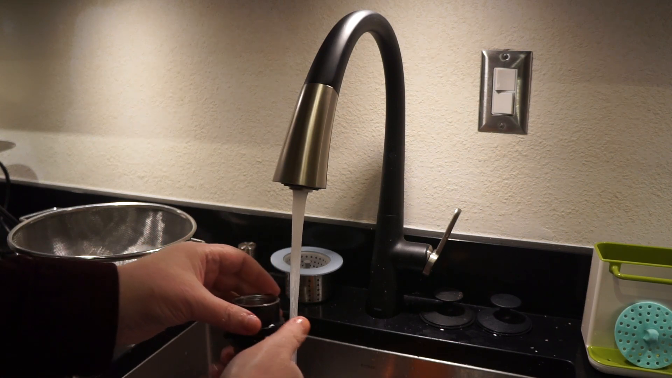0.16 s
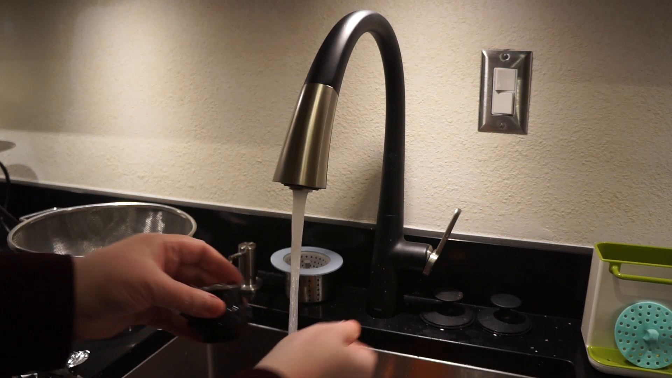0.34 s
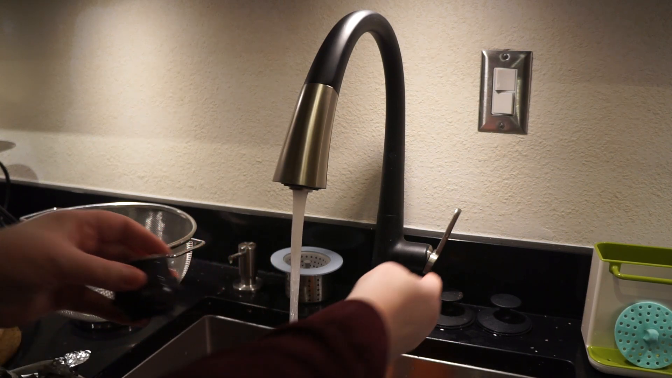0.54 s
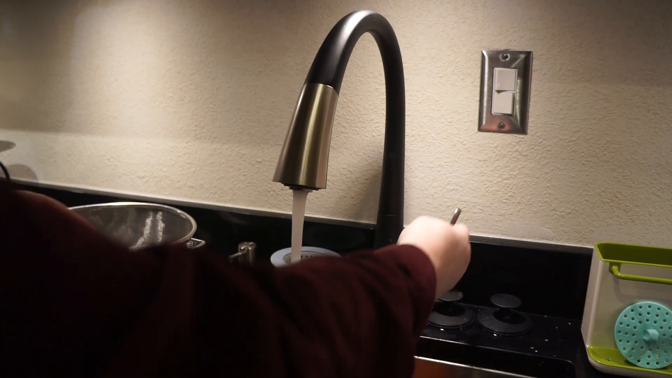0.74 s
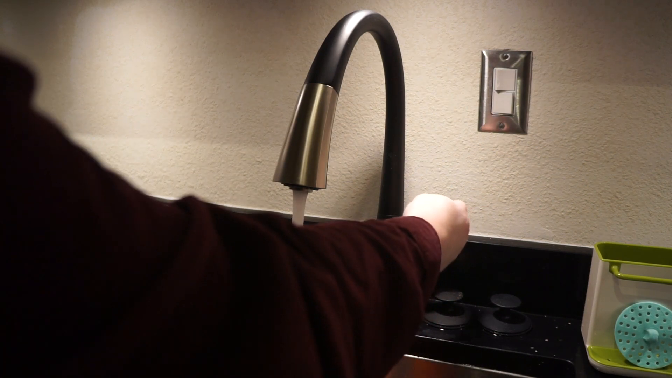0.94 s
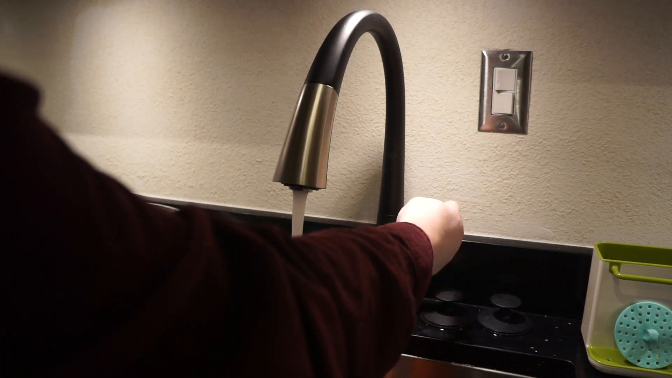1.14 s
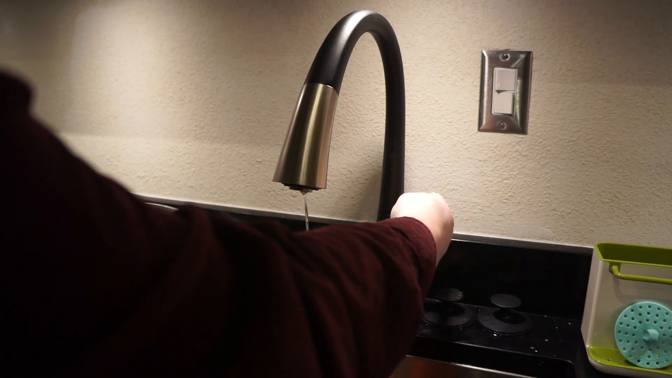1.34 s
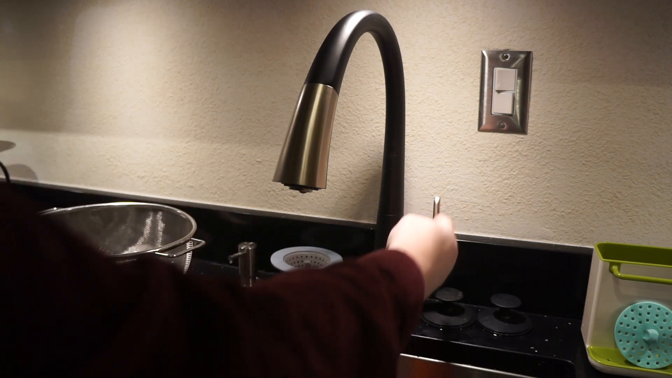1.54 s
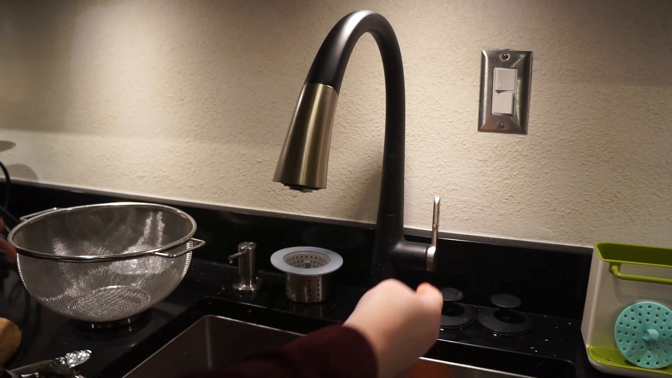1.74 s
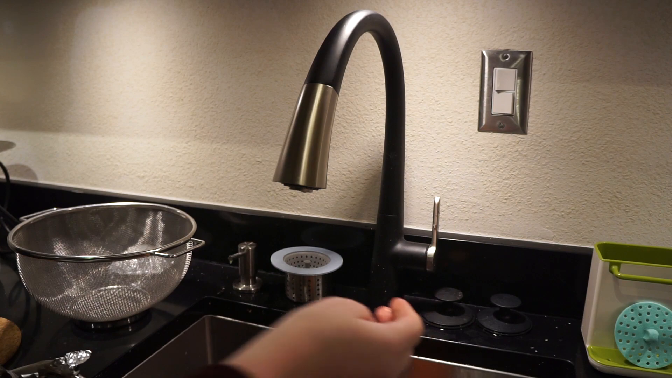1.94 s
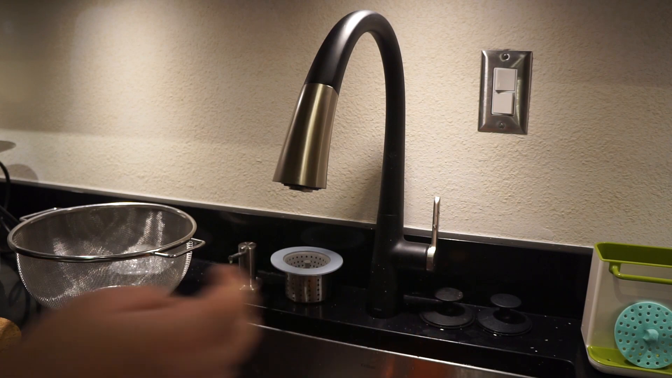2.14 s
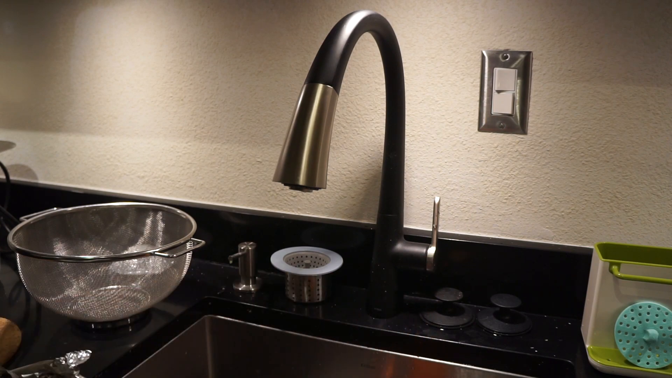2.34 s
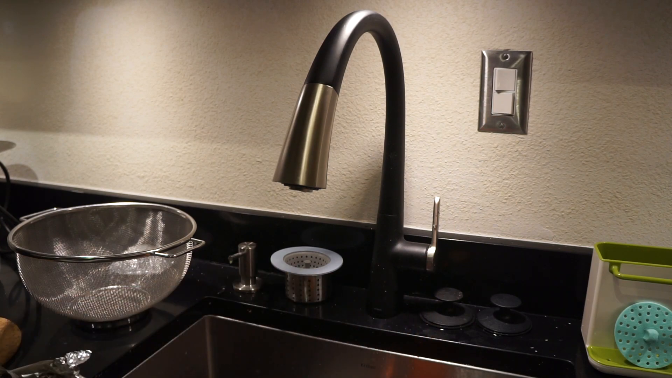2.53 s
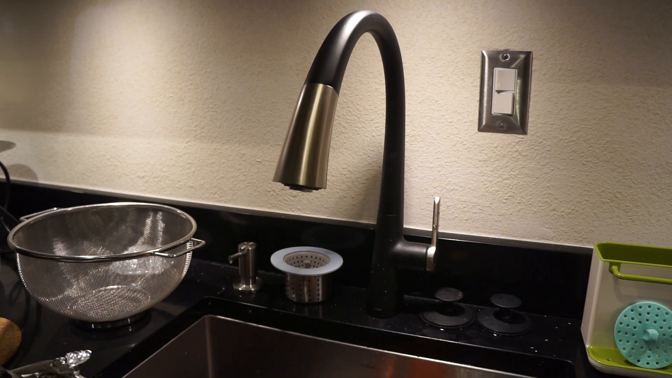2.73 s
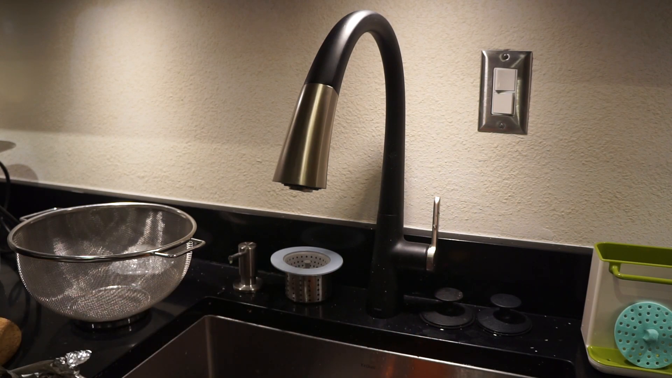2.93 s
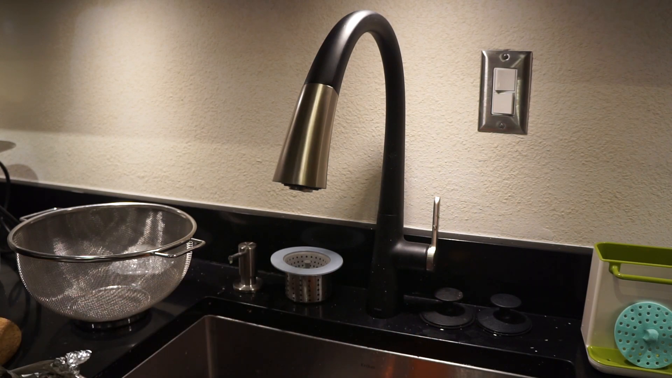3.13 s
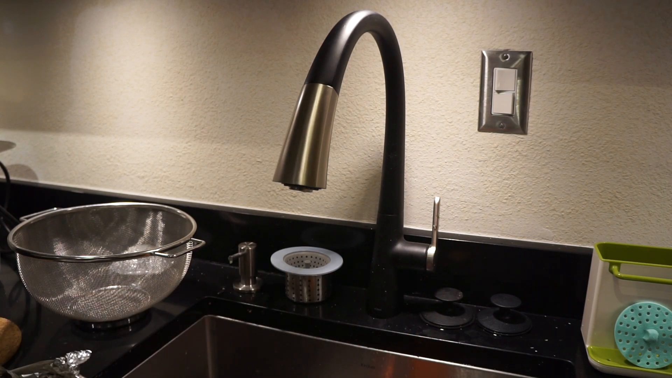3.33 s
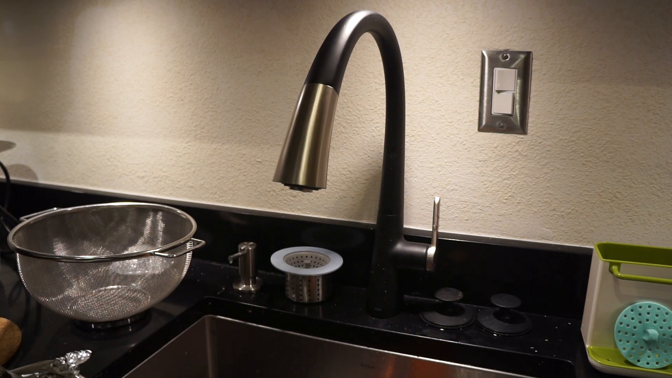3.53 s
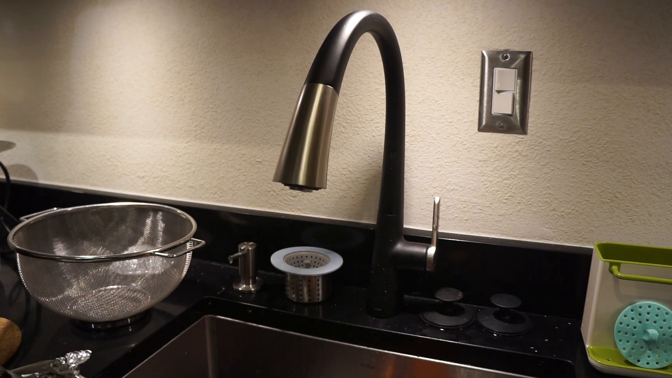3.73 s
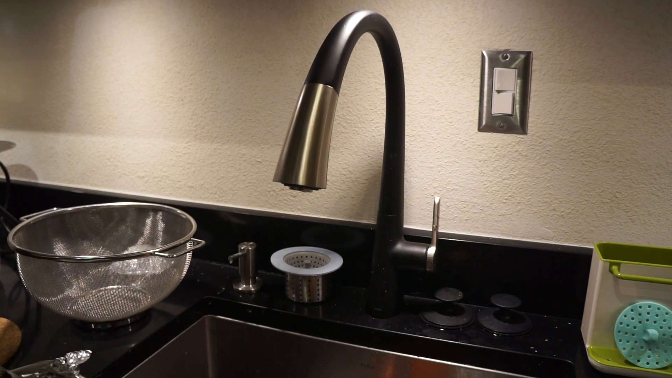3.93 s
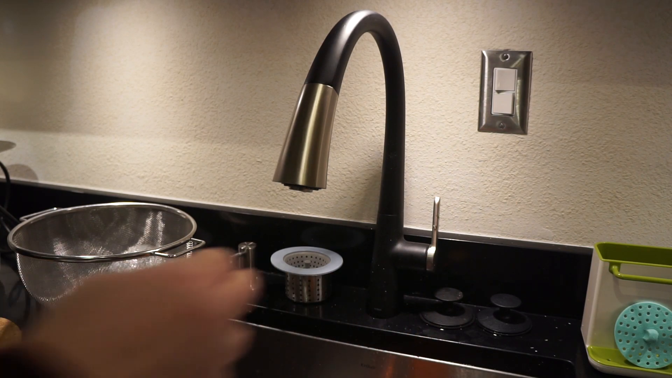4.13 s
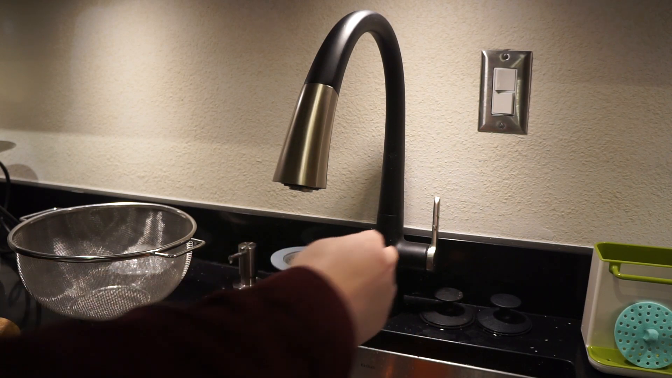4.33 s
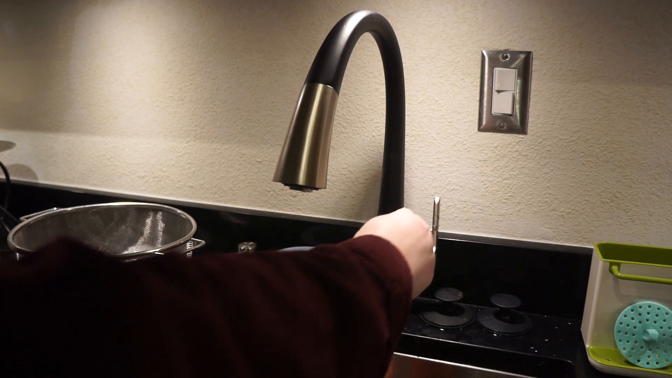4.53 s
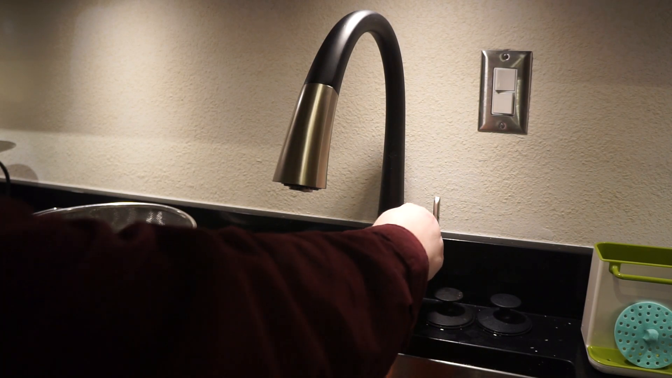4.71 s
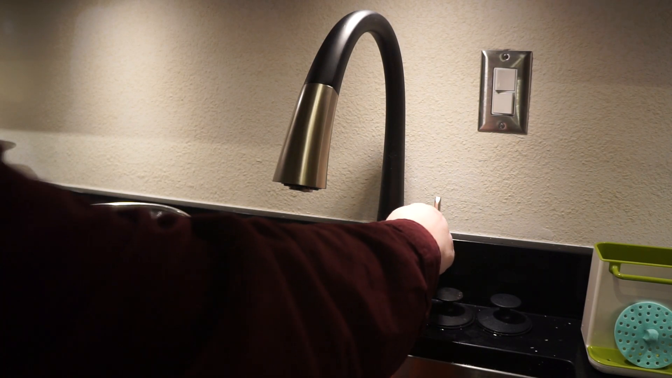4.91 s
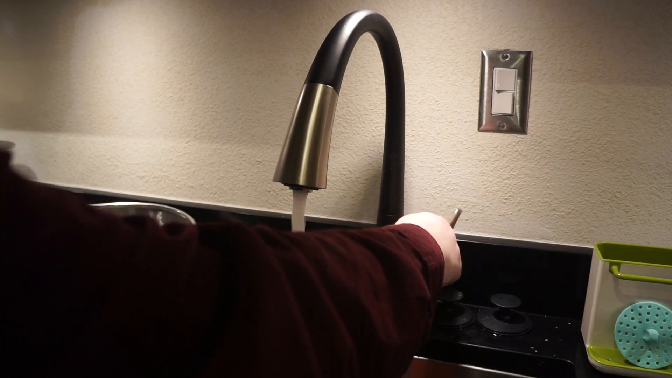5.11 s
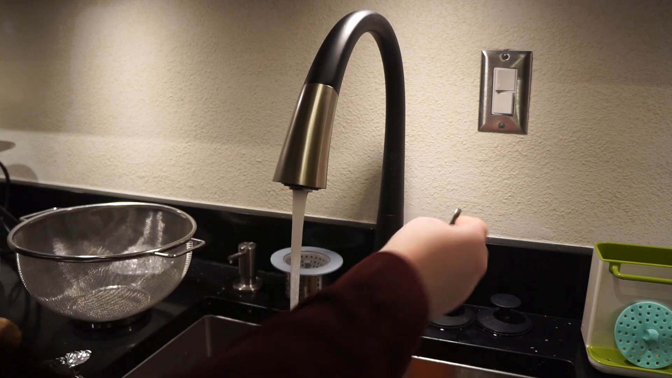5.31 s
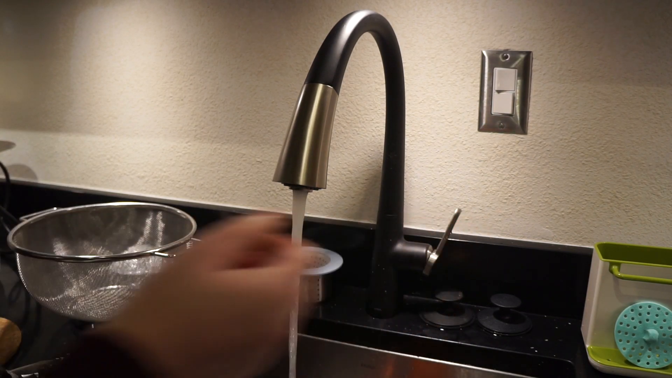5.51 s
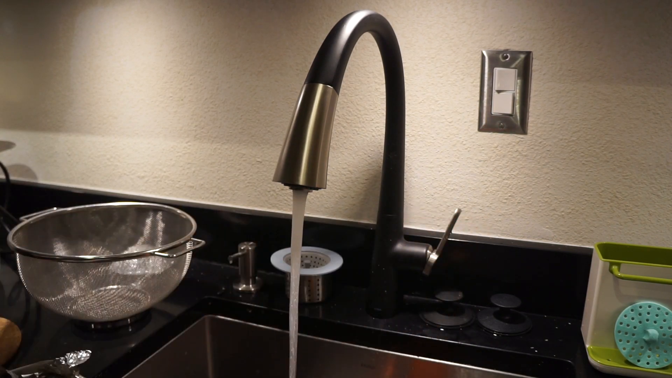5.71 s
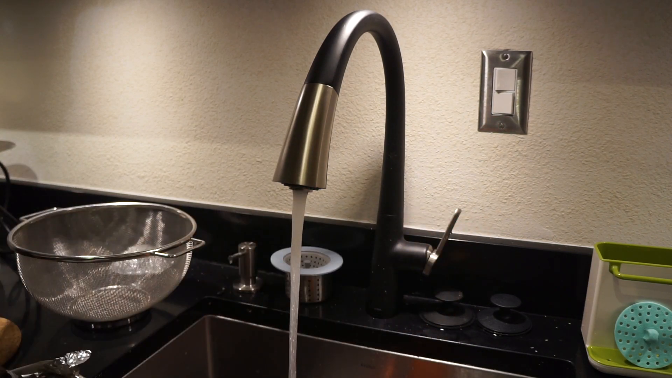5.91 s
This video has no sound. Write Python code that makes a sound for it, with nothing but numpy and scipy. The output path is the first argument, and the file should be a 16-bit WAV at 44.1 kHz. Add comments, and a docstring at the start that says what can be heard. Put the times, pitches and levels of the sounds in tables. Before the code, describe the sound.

A kitchen tap splashes brightly into a steel sink, shuts off, leaves a quiet pause with rustles and a dull clatter, then runs again.

```python
"""Kitchen tap and steel sink.

An aerated tap pours into a steel sink, is shut off, and is opened again; its jet, filtered noise, hisses before
the water, a mass of damped droplet tones echoed by the ringing steel, lands. In the pause the last water drips away,
something rustles and ticks beside the sink, and something clatters dully on the counter: noise bursts through modes.
An appliance hums as a sum of sines in a small, hard room, whose echo is decaying noise convolved with the sources."""
import sys
import numpy as np
from scipy import signal
from scipy.fft import rfft, irfft, next_fast_len
from scipy.io import wavfile
from scipy.ndimage import uniform_filter1d, map_coordinates

SR = 44100
rng = np.random.default_rng(int(sys.argv[2]) if len(sys.argv) > 2 else 0)


def put_to_file(sound):
    """Save the sound as 16-bit audio at rate SR, in the file named by the first command-line argument."""
    columns = np.atleast_2d(sound).T  # one column per channel
    safe = np.clip(columns, -1, 1)
    whole_steps = np.round(safe * 32767)
    wavfile.write(sys.argv[1], SR, whole_steps.astype(np.int16))


N = 262836

# appliance hum lines: (frequency [Hz], relative level [dB], phase wander [rad])
HUM_LINES = [(119.8, -56, .2), (178, -60, .7), (205.5, -52.5, .35), (237, -51.8, .12), (318, -61, .25),
             (480, -69, .3), (902, -72, .3)]
# spectra of room air, room rumble and counter boom: (frequency [Hz], relative level [dB])
AIR_SPECTRUM = [(53, -50), (90, -26), (107, -3), (148, -5), (162, -7), (239, -3.5), (266, -6), (316, -9.5),
                (478, -15), (1570, -22), (2830, -27.5), (4550, -27), (6030, -31), (11100, -32),
                (16000, -31.5)]
RUMBLE_SPECTRUM = [(15, -5), (30, -3), (50, 0.5), (85, -2), (130, 1.5), (300, -58)]
BOOM_SPECTRUM = [(20, 1.5), (50, 1), (90, 0), (140, -3.5), (300, -40)]
# spectra of rubbing, clattering parts and counter thud: (frequency [Hz], relative level [dB])
RUBBING_SPECTRUM = [(240, -36.5), (400, -2), (765, -9), (921, -4), (1440, -11.5), (1680, -4.5), (2020, -9),
                    (3160, -11), (6050, -14), (14400, -11.5), (16000, -28.5)]
KNOCK_SPECTRUM = [(150, -27), (400, -5.5), (1100, 4.5), (1800, 0), (2250, -5), (2800, -19), (5000, -18),
                  (8000, -47), (15000, -44)]
THUD_SPECTRUM = [(20, -9), (48, -7), (85, -8), (150, 2), (220, 8), (320, -3.5), (700, -41)]
# spectra of the aerated jet and of the water on steel: (frequency [Hz], relative level [dB])
AERATOR_SPECTRUM = [(180, -11), (300, -3), (343, -11), (462, -3.5), (842, -21.5), (915, -15.5), (1640, -2),
                    (1810, -6), (2480, 2.5), (3130, -3.5), (4990, 0.5), (6520, -1.5), (14500, 3),
                    (16000, -4.5)]
SPLATTER_SPECTRUM = [(500, -47.5), (1200, -35), (2100, -15), (2550, -7.5), (2960, -8.5), (3300, -2.5),
                     (4700, -0.5), (5500, 1.5), (6300, 5.5), (8000, -10), (16000, -40)]
SPRAY_SPECTRUM = [(2000, -32.5), (4500, -4.5), (6200, -3.5), (7500, 0), (10000, 0), (13500, 1.5),
                  (15500, 3.5), (16100, -41.5)]
DRUM_SPECTRUM = [(80, -21), (170, 4.5), (250, -10), (340, -9.5), (450, -3.5), (600, -8.5), (1000, -7),
                 (1400, -11.5), (2000, -5.5), (4000, -49)]
# left-right likeness of room sounds and water: (frequency [Hz], likeness [0-1])
ROOM_LIKENESS = [(100, 0.99), (250, 0.9), (600, 0.58), (1300, 0.25), (2500, 0.2), (6000, 0.045)]
WATER_LIKENESS = [(200, 1), (1000, 0.76), (2500, 0.84), (5000, 0), (16000, 0)]
# reverberation of the kitchen: (frequency [Hz], T60 [s])
KITCHEN_T60 = [(100, 0.25), (1000, 0.45), (5000, 0.29), (15000, 0.11)]
# modes of brushed things, knocked parts, and pipe with tap: (frequency [Hz], width [Hz], relative level [dB])
CRINKLE_MODES = [(3080, 390, -1), (4990, 200, -4), (6700, 440, -6.5), (10800, 580, -3.5), (12700, 900, -4),
                 (14500, 1400, 10)]
KNOCKED_MODES = [(426, 110, 7), (1010, 51, -3), (1260, 150, -10), (1480, 260, -4.5)]
PIPE_MODES = [(170, 64, 7.5), (265, 180, 1), (426, 54, 3.5), (620, 37, -13), (1530, 320, -13),
              (2800, 330, -10)]
# modes of the basin and, lower, of the sink floor: (frequency [Hz], width [Hz], relative level [dB])
BASIN_MODES = [(2500, 250, -7), (3360, 170, -3.5), (3950, 58, -9), (4270, 92, -7), (4750, 200, -2),
               (5115, 34, -5), (5865, 42, -4), (6110, 74, 1), (7190, 50, -5), (7410, 50, 2),
               (8250, 93, -10), (9480, 50, -7)]
FLOOR_MODES = [(455, 66, 0), (1270, 35, 6), (1705, 116, 7)]
# low bumps against the counter: (time [s], level [dB], T60 [s])
BUMPS_AT = [(.11, -55, 2), (1.36, -51, 1.8), (3.905, -43, 0.63), (3.97, -43.5, 1.15), (4.41, -51, 0.49),
            (5.14, -42, .5), (5.45, -48, 1.1)]
# strokes of a sleeve or hand: (start [s], end [s], rise [s], release T60 [s], relative level [dB])
STROKES_AT = [(1.6, 1.743, 0.085, 3.1, -53), (2.104, 2.602, 0.24, 3.7, -51), (2.916, 3.0, 0.015, 0.87, -59),
              (3.36, 3.85, 0.077, 2.4, -66), (3.903, 3.98, 0.057, 1, -47), (4.25, 4.7, 0.34, 4.2, -56)]
# sharp drops and light clinks: (time [s], relative level [dB], pitch [Hz])
TICKS_AT = [(.092, -13, 7860), (1.367, -16, 3480), (1.78, -43.5, 2850), (1.84, -47, 3370),
            (1.981, -45, 2970), (2.26, -40, 6850), (2.354, -41.5, 7620), (2.421, -38, 8100),
            (2.425, -37, 12000), (2.52, -44, 14400), (2.542, -38.5, 4890), (2.78, -38, 10600),
            (2.932, -38.5, 4420), (2.94, -38, 13500), (2.974, -45, 3020), (3.164, -42.5, 12900),
            (3.338, -43, 9360), (3.438, -34, 6360), (3.44, -39, 12500), (3.664, -42, 11300),
            (3.693, -43, 11900), (4.11, -43, 9000), (4.206, -38, 12400), (4.941, -45.5, 4660),
            (5.755, -9.5, 8000), (5.923, -12, 7650)]
# dull contacts of parts and counter: (time [s], relative level [dB], thud re knock [dB], T60 [s])
KNOCKS_AT = [(.125, -26, -25, 0.069), (.135, -17.5, -15, 0.075), (3.904, -26.5, -2.5, 0.18),
             (3.934, -23, 2.5, 0.23), (3.97, -19.5, -4, .21), (3.994, -17.5, -19, .12),
             (4.021, -34, 3.5, 0.13)]
# jolts of the pipe as the valve shuts and opens: (time [s], relative level [dB])
VALVE_JOLTS = [(1.31, -38), (1.345, -38), (1.705, -41.5), (1.722, -38), (5.12, -36.5), (5.155, -41.5)]
# air spitting from the spout just ahead of the water: (time [s], level [dB], centre [Hz])
AIR_SPIT = (5.10, -37.5, 3500)
# the stream breaks and slaps the steel: (time [s], relative level [dB], centre [Hz])
SLAPS_AT = [(.03, -12.5, 4960), (.088, -11, 9000), (.175, -10, 11000), (0.229, -6, 4440),
            (.252, -7.5, 11500), (.357, -7, 3950), (.405, -6, 8400), (.476, -9, 9050), (.505, -6.5, 10100),
            (.546, -8.5, 4580), (.56, -8, 12000), (.679, -5.5, 6040), (.711, -14, 5000), (.813, -6, 4240),
            (.965, -9, 3620), (.988, -7, 3170), (1.039, -6.5, 4500), (1.098, -4.5, 6600),
            (1.165, -11, 4470), (1.212, -7.5, 13000), (1.324, -7.5, 5740), (1.367, -6, 13000),
            (1.43, -6, 10000), (1.467, -4.5, 4040), (5.422, -12.5, 9000), (5.537, -7, 4470),
            (5.562, -9, 3950), (5.606, -8, 4600), (5.634, -6, 3350), (5.69, -4.5, 9100),
            (5.744, -7.5, 4170), (5.762, -4, 12500), (5.781, -9, 3960), (5.849, -8.5, 3800),
            (5.881, -9, 11500), (5.945, -7, 4100)]
# runs of the tap: (valve opens [s], stream lands [s], valve shuts [s])
TAP_RUNS = [(-1, -.1, 1.545), (5.145, 5.398, 7)]

AIR_DB, RUMBLE_DB = -51, -59
BUMP_RISE_S = 0.015
TICK_T60_S, TICK_DAMPING = 0.14, 0.51  # ring at 4 kHz; it shortens as this power of the pitch
OPEN_S, LAND_S = 0.0087, 0.0079  # rise of the hiss and of the splashing
DRAIN_DB_PER_S = 226  # the stream thins out once the valve is shut
CLOSE_S, CLOSE_DB = 0.4, 7  # the lever takes this long to close, and the stream loses this much force
SPLATTER_DB, SPRAY_DB, DRUM_DB, JET_DB = -29.9, -22.4, -48.5, -33
SETTLE_DB_PER_S = 1.3  # the spray eases as the sink floor fills
SLAP_T60_S, SLAP_HANG = 0.096, 0.59  # decay at 4 kHz; finer spray hangs on longer, as this power of its pitch
TOP_HZ = 16050


def amp(db):
    """Logarithmic level: decibels become an amplitude gain."""
    return 10 ** (np.asarray(db) / 20)


def unit(x):
    """Normalization: the signal is scaled to rms 1."""
    return x / np.sqrt(np.mean(x ** 2) + 1e-20)


def along(points, hz):
    """Interpolation of (frequency [Hz], value) points on a logarithmic frequency axis."""
    f, v = np.transpose(points)
    return np.interp(np.log(hz + 1), np.log(f + 1), v)


def wobble(rate):
    """Slow random modulation: a smooth curve through random knots, rate of them a second."""
    knots = rng.standard_normal(int(N * rate / SR) + 4)
    return map_coordinates(knots, [np.arange(N) * rate / SR])


def envelope(start, end, rise, t60):
    """Exponential decay: a straight rise, a hold until end, then a release of 60 dB in t60."""
    t = np.arange(N) / SR
    return np.clip((t - start) / rise, 0, 1) * amp(-60 * np.maximum(t - end, 0) / t60)


def filtered(x, response):
    """Linear filtering: the spectrum is multiplied by a response of frequency."""
    n = x.shape[-1]
    m = next_fast_len(n + 8192)
    return irfft(rfft(x, m) * response(np.fft.rfftfreq(m, 1 / SR)), m)[..., :n]


def coloured(x, spectrum):
    """Spectral shaping: the spectrum is imposed on x, which is then set to rms 1."""
    return unit(filtered(x, lambda hz: amp(along(spectrum, hz))))


def resonances(modes, hz):
    """Modal superposition: causal damped resonators (frequency, width, level) add up."""
    return sum(amp(db) * 1j * hz * w / (c * c - hz * hz + 1j * hz * w) for c, w, db in modes)


def stereo(pair, likeness):
    """Coherence: two unrelated signals mix as mid and side into left and right of given likeness."""
    def mid_side(hz):
        turn = np.arccos(np.clip(along(likeness, hz), -1, 1)) / 2
        return np.array([np.cos(turn), np.sin(turn)])
    mid, side = filtered(pair, mid_side)
    return np.array([mid + side, mid - side])


def noise(spectrum, likeness, size=N):
    """Random turbulence: coloured stereo noise of rms 1."""
    return coloured(stereo(rng.standard_normal((2, size)), likeness), spectrum)


def pan(db):
    """Level panning: gains for a left-minus-right level difference."""
    return amp([[db / 2], [-db / 2]])


def add(track, s, sound):
    """Superposition: a sound is mixed in at time s."""
    part = track[:, max(round(s * SR), 0):][:, :sound.shape[-1]]
    part += sound[..., :part.shape[-1]]


def patchy(x, depth_db, size=512):
    """Local modulation: loudness wanders separately in each region of pitch and time."""
    z = signal.stft(x, nperseg=size)[2]
    field = rng.standard_normal(z.shape[1:])
    for sweep in range(2):
        field = uniform_filter1d(field, size=14, axis=0)
        field = uniform_filter1d(field, size=5, axis=1)
    return signal.istft(z * amp(depth_db * unit(field)), nperseg=size)[1][:, :N]


def drops(rate, spread_db, centre_hz, octaves, cycles, size=128):
    """Granular excitation: droplet impacts and bursting bubbles are damped tones of unequal strength."""
    count = int(rate * N / SR)
    start, k = rng.integers(0, N, count), np.arange(size)
    hz = centre_hz * 2 ** (octaves * rng.standard_normal(count))
    hz = np.clip(hz, 800, SR / 2)
    strength = amp(spread_db * np.minimum(rng.exponential(size=count), 4.5))
    turns = hz[:, None] * k / SR
    grains = strength[:, None] * np.sin(2 * np.pi * turns) * np.exp(-turns / cycles)
    when = (start[:, None] + k).ravel()
    return unit(np.bincount(when, grains.ravel(), N + size)[:N])


def hum():
    """Periodic vibration: an appliance's motor lines are sines, wavering slightly in level and phase."""
    t, out = np.arange(N) / SR, np.zeros(N)
    for hz, db, wander in HUM_LINES:
        level = amp(db - 2.0 + 0.44 * wobble(4))
        out += level * np.sqrt(2) * np.sin(2 * np.pi * hz * t + wander * wobble(4))
    return out


def room_air():
    """Diffuse background field: steady noise of room air and rumble, less alike left and right in the treble."""
    air = amp(AIR_DB) * noise(AIR_SPECTRUM, ROOM_LIKENESS)
    return air + amp(RUMBLE_DB) * noise(RUMBLE_SPECTRUM, ROOM_LIKENESS)


def kitchen(x):
    """Reverberation: convolution with a decaying noise tail that dies sooner at the top."""
    burst = stereo(rng.standard_normal((2, SR // 2)), ROOM_LIKENESS)
    hz, t, z = signal.stft(burst, SR, nperseg=256)
    decay = amp(-60 * t / along(KITCHEN_T60, hz)[:, None])
    tail = signal.istft(z * decay, SR, nperseg=256)[1]
    return signal.fftconvolve(x, tail / np.linalg.norm(tail[0]), axes=1)[:, :N]


def bumps():
    """Structural boom: the counter and cabinet answer a bump with faint, decaying low noise."""
    swell = sum(amp(db) * envelope(s, s + BUMP_RISE_S, BUMP_RISE_S, t60) for s, db, t60 in BUMPS_AT)
    return swell * noise(BOOM_SPECTRUM, ROOM_LIKENESS)


def rustle():
    """Friction: rubbing is soft noise; a firmer stroke adds crackles at the modes of what is brushed."""
    stroke = sum(amp(db) * envelope(start, end, rise, release)
                 for start, end, rise, release, db in STROKES_AT)
    firm = np.minimum(stroke / amp(-50), 1)
    crackle = np.array([drops(rate=350, spread_db=4.5, centre_hz=7500, octaves=.7, cycles=5, size=256)
                        for ear in range(2)])
    crackle = crackle * amp(3.0 * wobble(35.08))
    crackle = unit(filtered(crackle, lambda hz: amp(-12) + resonances(CRINKLE_MODES, hz)))
    rubbing = patchy(noise(RUBBING_SPECTRUM, ROOM_LIKENESS), depth_db=3.0)
    return amp(-3.5) * stroke * (rubbing + firm * crackle)


def ticks():
    """Impulse response: each small contact is a brief crack and a short ring around its own pitch."""
    t, out = np.arange(SR // 6) / SR, np.zeros((2, N))
    for s, db, hz in TICKS_AT:
        t60 = TICK_T60_S * (hz / 4000) ** -TICK_DAMPING
        decay = amp(-60 * t / 0.0046) + amp(-3.0 - 60 * t / t60)  # crack, then ring
        crack = stereo(rng.standard_normal((2, len(t))), ROOM_LIKENESS) * decay
        ring = filtered(crack, lambda f: resonances([(hz, hz * 0.069, 0)], f))
        add(out, s, amp(db + 1.5) * ring / np.abs(ring).max())
    return out


def knocks():
    """Impact: a noise blow excites the hollow modes of parts, and the counter thuds beneath."""
    t, out = np.arange(SR // 3) / SR, np.zeros((2, N))
    for s, db, thud_db, t60 in KNOCKS_AT:
        decay = amp(-60 * t / t60) + amp(-9.0 - 60 * t / 0.0078)
        blow = noise(KNOCK_SPECTRUM, ROOM_LIKENESS, size=len(t)) * decay
        ring = filtered(blow, lambda hz: 1 + amp(-9.5) * resonances(KNOCKED_MODES, hz))
        thud_swell = amp(-60 * t / 0.2) * (1 - np.exp(-t / 0.0023))
        thud = noise(THUD_SPECTRUM, ROOM_LIKENESS, size=len(t)) * thud_swell
        add(out, s, amp(db - 11.5) * (ring + amp(thud_db) * thud))
    return out


def valve():
    """Pipe resonance: each jolt of the valve sets the pipe modes ringing briefly."""
    t, out = np.arange(SR // 4) / SR, np.zeros((2, N))
    for s, db in VALVE_JOLTS:
        shake = stereo(rng.standard_normal((2, len(t))), ROOM_LIKENESS)
        ringing = unit(filtered(shake, lambda hz: resonances(PIPE_MODES, hz)))
        swell = amp(db + 1 - 60 * t / 0.15) * (1 - np.exp(-t / 0.0046))
        add(out, s, swell * ringing)
    return out


def pressure():
    """Throttling: the stream's force is full while it runs and sags as the lever is pushed shut."""
    t = np.arange(N) / SR
    closing = sum(np.clip((t - shuts) / CLOSE_S + 1, 0, 1) * (t < shuts + 1)
                  for opens, lands, shuts in TAP_RUNS)
    return amp(-CLOSE_DB * closing)


def jet():
    """Jet turbulence: air drawn into the stream fizzes as noise at the spout; a spit leads the second run."""
    running = sum(envelope(opens, shuts, OPEN_S, 60 / DRAIN_DB_PER_S) for opens, lands, shuts in TAP_RUNS)
    fizz = noise(AERATOR_SPECTRUM, WATER_LIKENESS) * amp(JET_DB + 0.66 * wobble(50))
    s, db, hz = AIR_SPIT
    spit = noise(AERATOR_SPECTRUM, WATER_LIKENESS)
    spit = unit(filtered(spit, lambda f: resonances([(hz, hz * .5, 0)], f)))
    puff = amp(db) * envelope(s, s + 0.034, 0.033, 0.098)
    return pan(-0.62) * (running * pressure() * fizz + puff * spit)


def basin(x, bounce_t60, bounce_db, size=512):
    """Reflection and plate modes: drops land at ever new spots, so wall echoes change; the pitches stay fixed."""
    blocks = np.pad(x, (0, -N % size)).reshape(1, -1, size)
    t = np.arange(4 * size) / SR
    decay = amp(-60 * t / bounce_t60)
    walls = rng.standard_normal((2, blocks.shape[1], len(t))) * decay
    walls *= amp(bounce_db) / np.linalg.norm(decay)
    walls[:, :, 0] += rng.choice([-1, 1], walls.shape[:2])  # direct sound, of random sign
    echoes = signal.fftconvolve(blocks, walls, axes=2)
    when = (np.arange(blocks.shape[1])[:, None] * size + np.arange(echoes.shape[2])).ravel()
    heard = np.array([np.bincount(when, ear.ravel())[:N] for ear in echoes])
    return filtered(stereo(heard, WATER_LIKENESS), lambda hz: 1 + amp(-3) * resonances(BASIN_MODES, hz))


def slaps():
    """Clustered impact: a lump of water lands as many drops; big drops sound low, fine ones high."""
    t, out = np.arange(SR // 5) / SR, np.zeros((2, N))
    cluster = drops(rate=6000, spread_db=3.0, centre_hz=8070, octaves=0.86, cycles=0.97)
    cluster = unit(basin(cluster, bounce_t60=0.023, bounce_db=-3))
    for s, db, hz in SLAPS_AT:
        t60 = SLAP_T60_S * (hz / 4000) ** SLAP_HANG
        spatter = np.roll(cluster, -round(s * SR), axis=1)[:, :len(t)]
        spatter = unit(filtered(spatter, lambda f: resonances([(hz, hz * 0.78, 0)], f) ** 3))
        swell = amp(-60 * t / t60) * (1 - np.exp(-t / 0.00084))
        add(out, s, amp(db - 13) * unit(swell * spatter) * np.sqrt(np.mean(swell ** 2)))
    return pan(-3.3) * out


def splatter():
    """Droplet impact: coarse drops strike the steel and echo off its walls, patchy in pitch and time."""
    coarse = drops(rate=3500, spread_db=3.5, centre_hz=4200, octaves=0.78, cycles=0.88)
    coarse = coarse * amp(1.75 * wobble(70))
    echoed = basin(coarse, bounce_t60=0.028, bounce_db=-2.0)
    return coloured(patchy(echoed, depth_db=1.36), SPLATTER_SPECTRUM)


def spray():
    """Atomization: fine drops make shorter, higher tones that the basin echoes for longer."""
    fine = drops(rate=6000, spread_db=3.5, centre_hz=10970, octaves=0.48, cycles=0.69)
    fine = fine * amp(1.1 * wobble(60) + 0.39 * wobble(20))
    return coloured(basin(fine, bounce_t60=0.055, bounce_db=2.0), SPRAY_SPECTRUM)


def drumming():
    """Forced plate vibration: the stream's noise drives the low modes of the sink floor."""
    push = noise(DRUM_SPECTRUM, WATER_LIKENESS)
    return unit(filtered(push, lambda hz: 1 + resonances(FLOOR_MODES, hz))) * amp(1.8 * wobble(25))


def water():
    """Stream impact: flow and force set the splatter and drumming; it surges, and the spray eases."""
    t = np.arange(N) / SR
    landed = [envelope(lands, shuts, LAND_S, 60 / DRAIN_DB_PER_S) for opens, lands, shuts in TAP_RUNS]
    flow = sum(landed) * amp(0.4 * wobble(22))
    settling = sum(on * amp(-SETTLE_DB_PER_S * np.maximum(t - lands, 0))
                   for on, (opens, lands, shuts) in zip(landed, TAP_RUNS))
    force = pressure()
    splashing = amp(SPLATTER_DB) * flow * np.sqrt(force) * splatter()
    splashing = splashing + amp(SPRAY_DB) * settling * spray()
    return pan(-2.74) * splashing + amp(DRUM_DB) * flow * force * drumming()


def scene():
    """Superposition of direct sound, reverberation and background in the humming kitchen."""
    tap = water() + slaps() + jet() + valve()
    small = ticks() + rustle()
    clatter = knocks()
    echo = kitchen(amp(-7.5) * tap + amp(-4) * small + amp(-10.0) * clatter)
    return tap + small + clatter + echo + bumps() + hum() + room_air()


def record(dry):
    """Band limitation: nothing at or above TOP_HZ is passed."""
    return filtered(dry, lambda hz: hz < TOP_HZ)


dry = scene()
out = record(dry)
put_to_file(out)
```